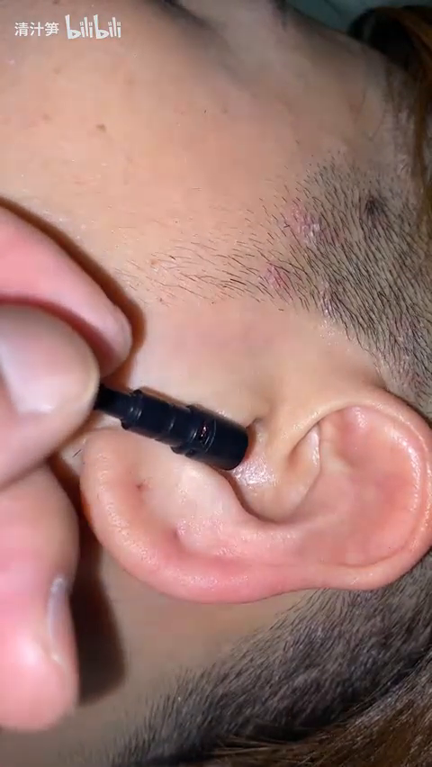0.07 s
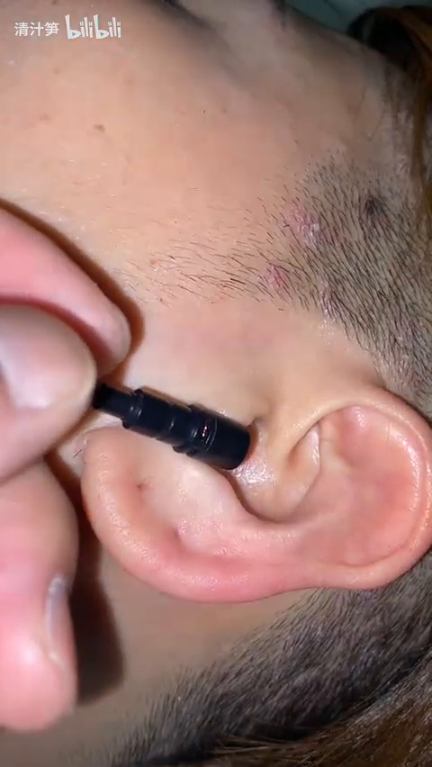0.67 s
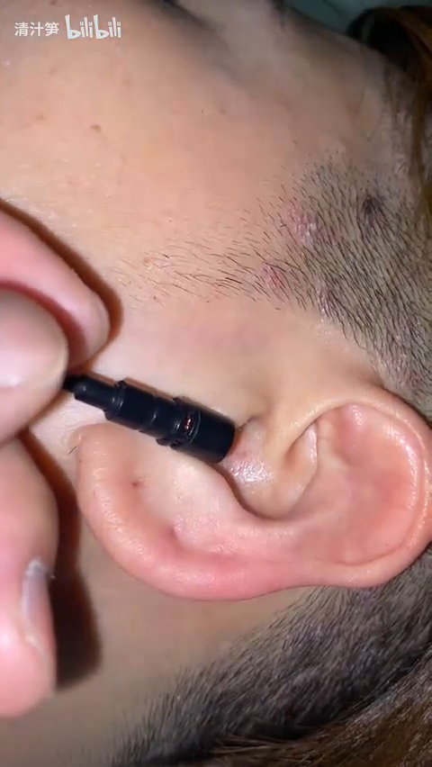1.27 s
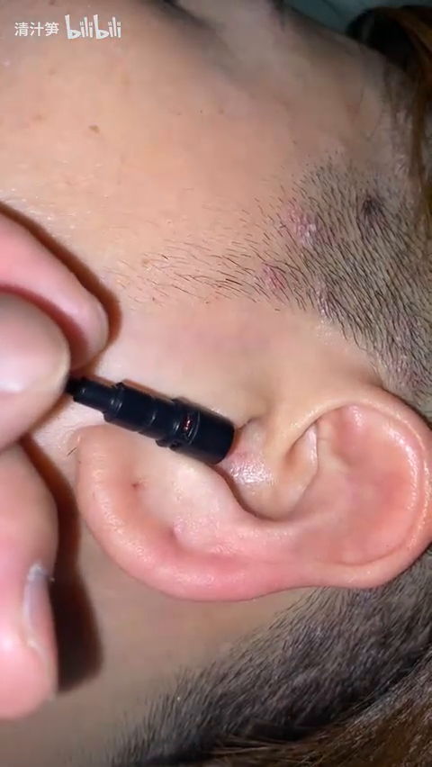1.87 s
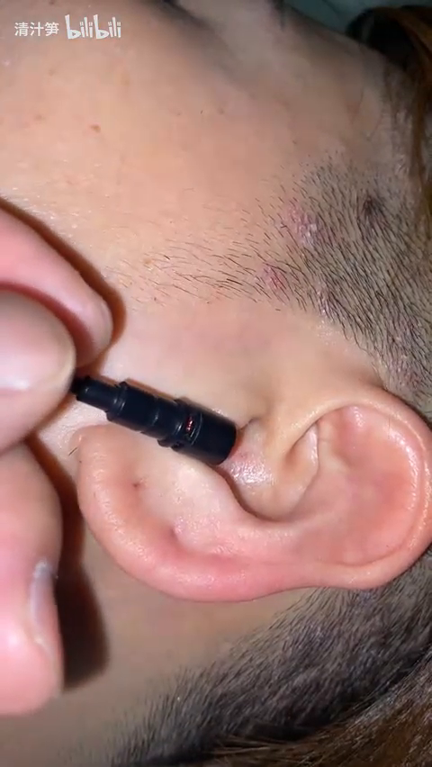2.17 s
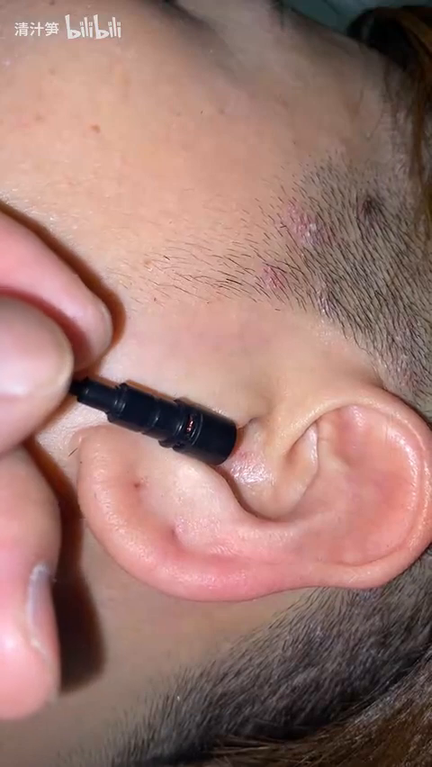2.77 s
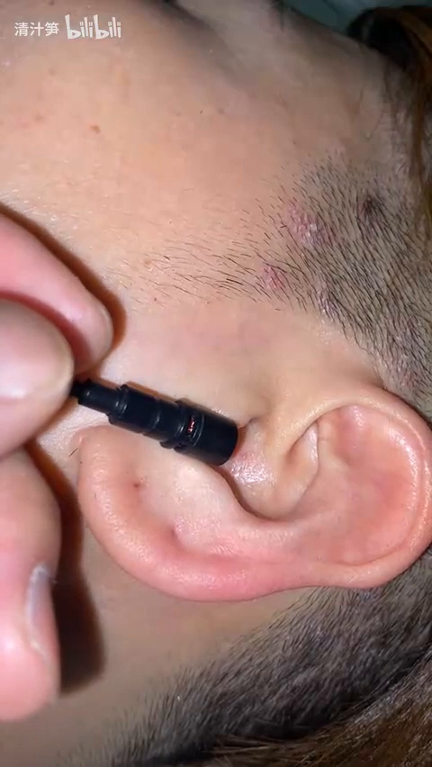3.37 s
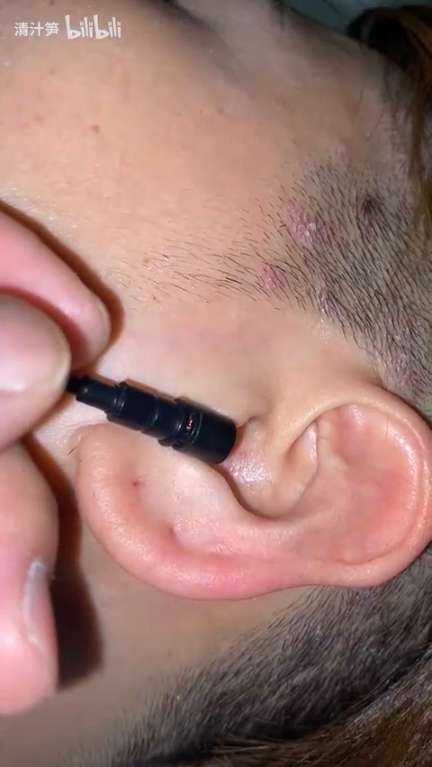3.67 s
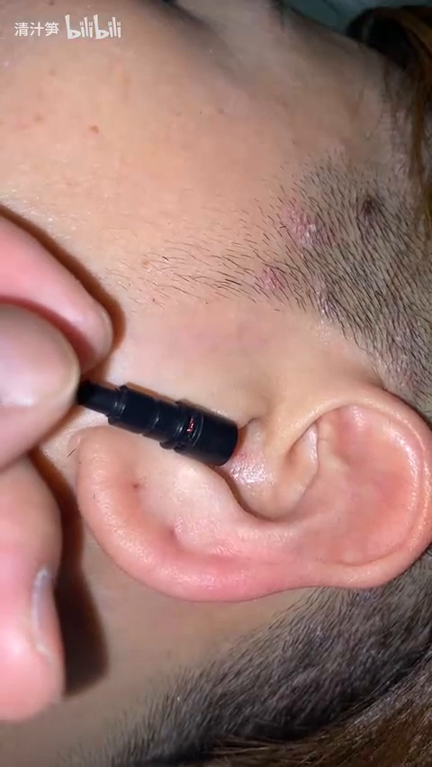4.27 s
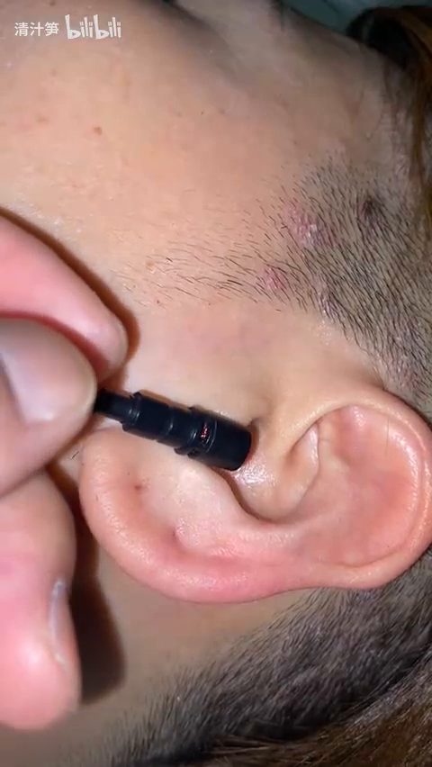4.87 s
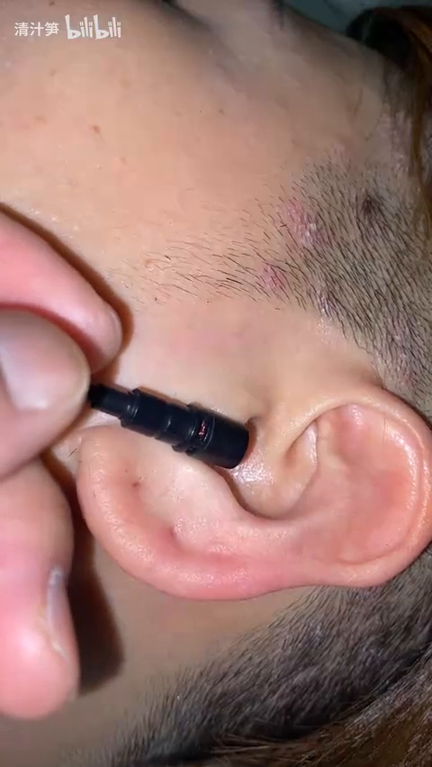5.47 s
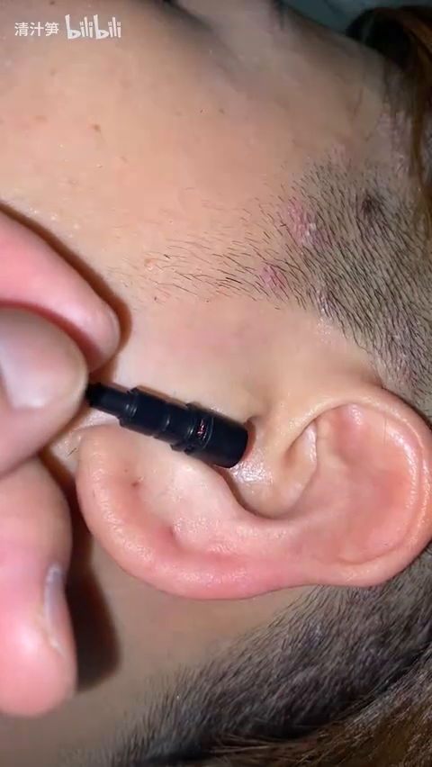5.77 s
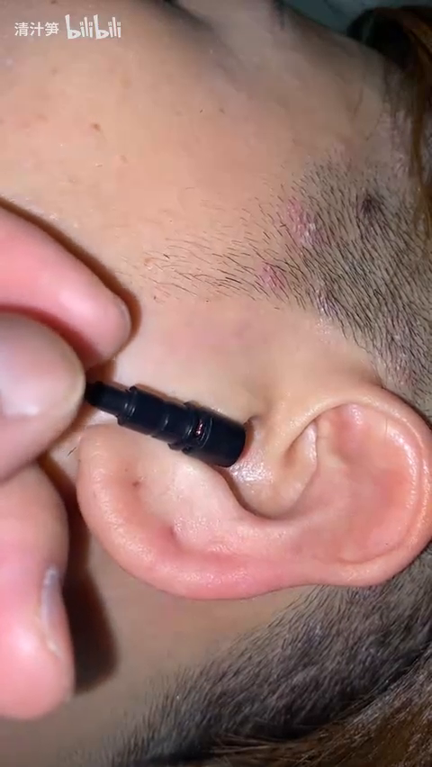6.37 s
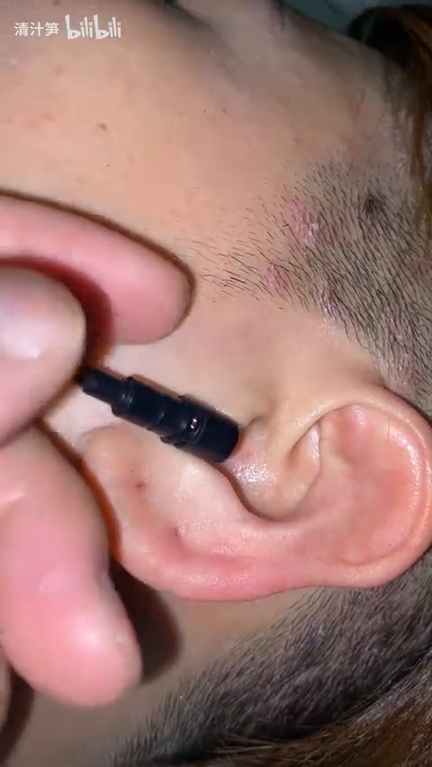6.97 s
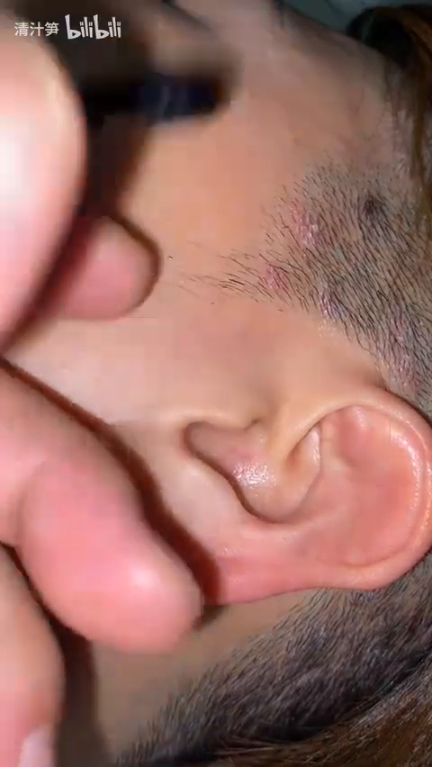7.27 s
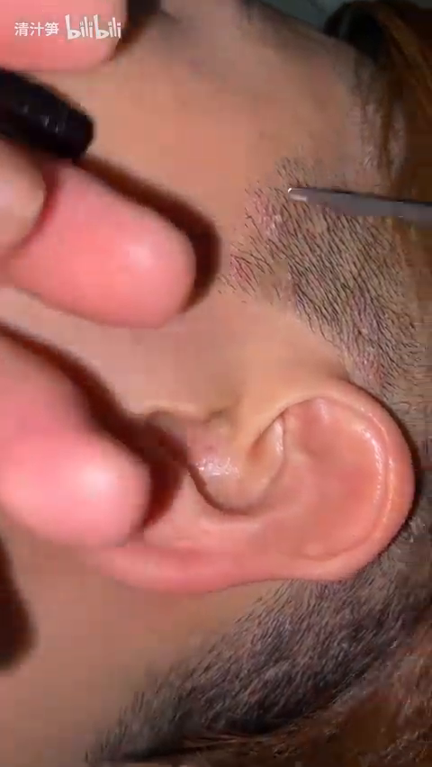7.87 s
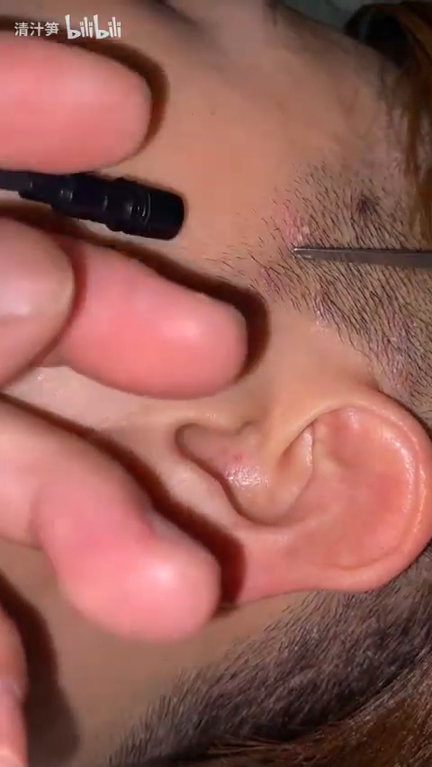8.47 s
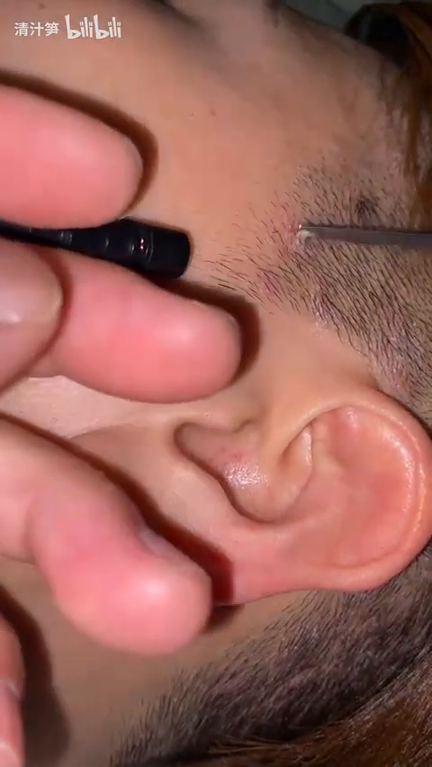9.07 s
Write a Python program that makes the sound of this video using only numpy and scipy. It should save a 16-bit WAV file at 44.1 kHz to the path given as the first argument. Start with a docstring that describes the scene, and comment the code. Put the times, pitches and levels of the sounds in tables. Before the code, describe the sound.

In a quiet room with a faint low hum, a slim tool is worked in an ear right at the microphone. Its tip sticks and peels off in three short runs of small hollow clicks, with light handle ticks and faint skin rustle between. Then the tool is withdrawn, and fingers shift their grip with louder sharp taps, soft bumps and raspy rubbing on the housing.

```python
"""First comes faint room noise with a low hum and a flutter too deep to hear, then a tool's handle ticks.
The slim tool is worked in an ear, right at the microphone: its tip sticks and peels off in three short
runs of hollow clicks that ring in the tip, the shaft and the ear canal. Then it is withdrawn. Fingers
shift their grip, snap and bump against the housing and rub over it in several strokes; their skin
catches and slips, which makes a low shudder, a rasp and a hiss."""
import sys
import numpy as np
from scipy import signal
from scipy.fft import rfft, irfft, next_fast_len
from scipy.io import wavfile
from scipy.ndimage import map_coordinates

SR = 44100
rng = np.random.default_rng(int(sys.argv[2]) if len(sys.argv) > 2 else 0)


def master_out(mix):
    """Clip the mix to full scale and print it as 16-bit PCM to the path in sys.argv[1]."""
    frames = np.transpose(np.atleast_2d(mix))
    ceiling = np.clip(frames, -1, 1)
    pcm = np.round(ceiling * 32767).astype(np.int16)
    wavfile.write(sys.argv[1], SR, pcm)


N = 407043

# tone of the room noise: (frequency [Hz], level [dB])
ROOM_NOISE_TONE = [(40, -26), (70, -4.5), (115, -14.5), (200, -2.5), (300, -6.5), (450, -10), (1000, -12),
                   (1600, -16), (3000, -23.5), (5800, -23), (7000, -28), (10000, -28.5), (15000, -30.5)]
# tones of the motor's hum: (frequency [Hz], level [dB])
HUM_TONES = [(48.4, -69.5), (96.9, -81), (145.3, -74)]
# how long the room rings: (frequency [Hz], time to fade by 60 dB [s])
ECHO_TIMES = [(200, 0.083), (1500, 0.15), (5000, 0.24), (12000, 0.14)]

# finger strokes over tool and housing: (time of fastest sliding [s], rise [s], fall [s],
# rasp level [dB], shudder above the rasp [dB], hiss above the rasp [dB])
FINGER_STROKES = [(1.02, 0.076, 0.16, -60.5, -13, -9.5), (1.35, 0.034, 0.068, -69, -5, -5),
                  (2.885, 0.026, .05, -66, -2.5, -5), (4.55, 0.056, 0.15, -67.5, 1, -6),
                  (4.82, 0.024, 0.07, -60, -5, 0), (4.905, 0.033, 0.032, -63, -6, -5.5),
                  (5.12, 0.049, 0.098, -69, 1, -7), (6.25, 0.11, 0.047, -63, -3, -12),
                  (6.44, 0.088, 0.21, -65.5, -13, -10), (6.96, 0.068, .08, -63, -4.5, -6.5),
                  (7.11, 0.084, 0.1, -65, -4, 7.5), (7.17, .025, 0.036, -50, -11, -5),
                  (7.215, 0.023, 0.055, -53.5, 5.5, -3), (7.412, 0.015, 0.016, -50.5, 4, 3),
                  (7.495, 0.04, 0.019, -33, -3, -10), (7.545, 0.0084, 0.0074, -37.5, -8, -22),
                  (7.57, 0.081, 0.032, -53, 8.5, 2.5), (7.902, 0.064, .033, -52.5, 6.5, 0.5),
                  (7.975, 0.02, 0.049, -64.5, 3.5, 8.5), (8.1, 0.061, 0.055, -51, -2.5, 2.5),
                  (8.189, 0.047, .018, -56.5, 10.5, -1.5), (8.25, 0.031, 0.027, -64, 2, 4),
                  (8.36, .06, 0.049, -56.5, -2.5, 2.5), (8.472, 0.014, 0.055, -60, 0.5, 2.5),
                  (8.595, 0.097, .05, -56, -1.5, 2), (8.69, 0.065, 0.037, -62.5, 5, 3),
                  (8.87, 0.045, .06, -66.5, 1.5, -1)]
# the holding hand is never quite still: (shudder level [dB], rasp level [dB], hiss level [dB])
FIDGET_LEVELS = [-86.5, -77, -84]
# how the housing rings under a rubbing finger: (frequency [Hz], width [Hz], level [dB])
HOUSING_RESONANCES = [(122, 105, 9.5), (304, 200, -2), (500, 33, -26)]
# faint whistles of the gap between finger and housing: (frequency [Hz], width [Hz], level [dB])
GAP_RESONANCES = [(9900, 1600, -5.5), (14000, 620, -13)]
# tone of the rasp of sliding skin: (frequency [Hz], level [dB])
RASP_TONE = [(300, -7), (500, 1), (680, -3.5), (1000, -5), (1800, -8.5), (2300, -9.5), (3300, -16.5),
             (7000, -23), (10000, -32), (13000, -36)]
# tone of the hiss under a light and under a flattened fingertip: (frequency [Hz], level [dB])
LIGHT_HISS_TONE = [(1800, 0), (3300, 0), (5000, 0), (7500, -1), (9000, -7.5), (12000, -20), (14300, -6),
                   (15000, -18)]
PRESSED_HISS_TONE = [(2000, -30), (3300, 1.5), (6000, -3), (10000, -6), (15000, -18)]
# fingers snap off the housing: (time [s], level [dB])
FINGER_SNAPS = [(4.523, -41), (7.146, -18), (7.1827, -19), (7.214, -25), (7.2463, -13.5), (7.4042, -14.5),
                (7.812, -23), (8.052, -28.5), (8.24, -38), (8.3726, -30.5), (8.383, -33), (8.4274, -29.5)]
# soft bumps on the housing: (time [s], level [dB], pitch [Hz], fade length [cycles])
HOUSING_BUMPS = [(4.5219, -41, 337, 0.61), (6.758, -50.5, 92.4, 1.7), (7.1457, -28.5, 230, 0.68),
                 (7.1823, -10, 145, 0.6), (7.1824, -22, 507, 1.1), (7.19, -26, 59, 2.2),
                 (7.4041, -14, 151, 0.77), (7.571, -38.5, 163, 4.3), (7.812, -25.5, 215, 0.62),
                 (7.909, -27.5, 74.4, 1.33), (7.9252, -26.5, 167, 0.63), (8.723, -43, 270, .9)]
# light ticks of the handle: (time [s], level [dB], pitch [Hz])
HANDLE_TICKS = [(0.5904, -28, 2900), (0.6038, -38, 3100), (1.335, -47, 4000), (1.954, -40, 710),
                (4.5223, -41, 600), (5.959, -39, 2800), (7.659, -44, 2200), (8.3619, -26.5, 2300),
                (8.738, -41, 4200), (8.749, -45.5, 3500)]

# what rings in a click (tool tip, ear canal, tool shaft, the crack of the contact itself),
# each as (frequency [Hz], width [Hz], level [dB])
TIP_RESONANCES = [(4010, 310, -9), (4440, 810, -3), (5500, 170, -4.5)]
CANAL_RESONANCES = [(838, 126, 0.5), (1285, 450, -10.5)]
SHAFT_RESONANCES = [(2320, 113, 10.5)]
CRACK_RESONANCES = [(7920, 1200, 0.5), (9300, 720, 0.5), (12500, 1700, -17)]
# the tip drags between contacts: (start [s], length [s], level [dB])
TIP_DRAGS = [(1.124, 0.05, -53), (3.475, 0.048, -57.5), (3.541, 0.053, -50), (5.646, 0.1, -65),
             (5.732, 0.041, -54)]
# sticky contacts in the ear: (time [s], level [dB], canal in the mix [dB], shaft in the mix [dB])
STICKY_CONTACTS = [(1.0782, -38.5, -28, -10), (1.0847, -41.5, -19, -15), (1.1244, -42, -19, -15),
                   (1.1333, -37, -27, -9), (1.1521, -29, -13.5, -14.5), (1.162, -41.5, -24, -29),
                   (3.5004, -35.5, -7.5, -4.5), (3.5428, -27.5, -15, -11), (3.5708, -35.5, -4.5, -15),
                   (3.5744, -41, -20, 3), (5.6518, -44.5, -10, -9), (5.668, -35.5, -10, 1),
                   (5.694, -39, -13, -1), (5.7117, -45, -15, -10), (5.735, -40, -25, -1),
                   (5.7432, -33.5, -17, -14), (5.7465, -24.5, -10.5, -7.5), (5.7574, -36, -24, -9)]

TIP_DB, CRACK_DB = -11, -17.5  # tip and crack in the mix of every click
STROKE_SHAPE = 1.69  # shape of a stroke's swell and fade: 1 is pointed, 2 is a bell
BEAR_DOWN_DB = 1.5  # the finger presses harder as it goes: shudder gained over one rise or fall time
FIDGET_SWING_DB = 4  # how far the faint rustle between strokes comes and goes
LOW_CUT_HZ, TOP_HZ = 39, 16000  # the handling sounds carry nothing deeper, the recorder cuts off higher sound


def amp(db):
    """Turn decibels into a factor to multiply by."""
    return 10 ** (np.asarray(db) / 20)


def unit(x):
    """Scale a sound to an average strength (rms) of 1."""
    return x / np.sqrt(np.mean(x ** 2) + 1e-20)


def along(points, hz):
    """Read between (frequency, value) points, with octaves evenly spaced."""
    freqs, values = np.transpose(points)
    return np.interp(np.log(hz + 1), np.log(freqs + 1), values)


def filtered(x, response):
    """Multiply each frequency in a sound by response(frequency)."""
    size = next_fast_len(2 * len(x))
    return irfft(rfft(x, size) * response(np.fft.rfftfreq(size, 1 / SR)), size)[:len(x)]


def coloured(x, tone):
    """Shape a sound with a tone table and scale it to strength 1."""
    return unit(filtered(x, lambda hz: amp(along(tone, hz))))


def resonate(x, resonances):
    """Let a sound ring at a few frequencies; the narrower the width, the longer the ring."""
    return filtered(x, lambda f: sum(amp(db) * 1j * f * width / (hz * hz - f * f + 1j * f * width)
                                     for hz, width, db in resonances))


def dulled(x, hz, order):
    """Turn down the treble above hz; a higher order cuts more steeply."""
    return signal.sosfilt(signal.butter(order, hz, fs=SR, output='sos'), x)


def thinned(x, hz, order):
    """Turn down the bass below hz."""
    return signal.sosfilt(signal.butter(order, hz, 'high', fs=SR, output='sos'), x)


def wobble(rate):
    """A smooth curve through `rate` random values a second."""
    return map_coordinates(rng.standard_normal(int(N * rate / SR) + 4), [np.arange(N) * rate / SR])


def add(track, start, sound):
    """Mix a sound into a track at `start` seconds."""
    part = track[round(start * SR):][:len(sound)]
    part += sound[:len(part)]


def background():
    """Room noise, a motor's low hum and a flutter too deep to hear."""
    t = np.arange(N) / SR
    air = amp(-66.5 + 0.43 * wobble(rate=3.26)) * coloured(rng.standard_normal(N), ROOM_NOISE_TONE)
    drift = 0.19 * wobble(rate=3.3)
    hum = sum(amp(db) * np.sqrt(2) * np.sin(2 * np.pi * hz * t + drift) for hz, db in HUM_TONES)
    flutter = amp(-46.2) * np.sin(2 * np.pi * 11.5 * t)
    return air + hum + flutter


def room_echo(x):
    """The room adds a short, smooth tail in which each frequency dies at its own speed."""
    hz, t, noise = signal.stft(rng.standard_normal(SR // 2), SR, nperseg=256)
    fade = amp(-60 * t / along(ECHO_TIMES, hz)[:, None])
    tail = signal.istft(noise * fade, SR, nperseg=256)[1]
    tail *= 1 - np.exp(-np.arange(len(tail)) / SR / 0.013)  # the echo takes a moment to build
    return signal.fftconvolve(x, tail / np.linalg.norm(tail))[:N]


def slips(rate, spread_db):
    """Sliding as tiny one-way jerks at random moments, about `rate` a second."""
    moments = rng.random(N) < rate / SR
    jerks = moments * amp(spread_db * np.clip(rng.standard_normal(N), -2, 2))
    return unit(jerks - jerks.mean())


def stick_slip(rate, scatter):
    """Skin catches and lets go at an uneven pace, with one jerk each time it lets go."""
    count = np.cumsum(rate * np.exp(scatter * wobble(rate=150))) / SR
    releases = np.diff(np.floor(count), prepend=0)
    jerks = releases * amp(2.5 * np.clip(rng.standard_normal(N), -2, 2))
    return unit(jerks - jerks.mean())


def stroke_levels():
    """Shudder, rasp and hiss in dB: over faint fidgeting, each stroke swells, fades and turns heavier."""
    t = np.arange(N) / SR
    power = np.outer(amp(FIDGET_LEVELS), amp(FIDGET_SWING_DB * wobble(rate=5))) ** 2
    for time, rise, fall, db, shudder_db, hiss_db in FINGER_STROKES:
        near = slice(max(0, int((time - 4 * rise) * SR)), int((time + 4 * fall) * SR))
        progress = (t[near] - time) / np.where(t[near] < time, rise, fall)
        rasp = amp(db) * np.exp(-np.abs(progress) ** STROKE_SHAPE)
        shudder = rasp * amp(shudder_db + BEAR_DOWN_DB * progress)
        power[:, near] += np.array([shudder, rasp, rasp * amp(hiss_db)]) ** 2
    return 10 * np.log10(power)


def gap_whistle():
    """The gap under the finger opens and closes as it rolls, so faint whistles come and go."""
    whistle = np.zeros(N)
    for hz, width, db in GAP_RESONANCES:
        opening = amp(db + 0.5 + 2.6 * wobble(rate=12))
        whistle += opening * unit(resonate(slips(rate=23000, spread_db=3), [(hz, width, 0)]))
    return dulled(whistle, 15200, order=12)


def finger_rubbing():
    """Skin slides in small slips: heavy ones shake the housing, many fine ones rasp and hiss."""
    shudder_db, rasp_db, hiss_db = stroke_levels()
    heavy = stick_slip(rate=230, scatter=0.6)
    housing = resonate(heavy + 0.5 * slips(rate=2000, spread_db=4), HOUSING_RESONANCES)
    shudder = amp(shudder_db + 3) * unit(dulled(housing, 660, order=4))
    rasp = amp(rasp_db) * coloured(0.32 * heavy + slips(rate=4000, spread_db=2), RASP_TONE)
    whistle = gap_whistle()
    bright = unit(coloured(0.19 * heavy + slips(rate=14000, spread_db=5.5), LIGHT_HISS_TONE) + whistle)
    dark = coloured(slips(rate=12000, spread_db=8), PRESSED_HISS_TONE)
    # a flattened fingertip muffles the hiss: the more the rasp leads, the darker it gets
    pressed = np.clip((rasp_db - hiss_db) / 9, 0, 1)
    hiss = amp(hiss_db + 0.5) * (np.sqrt(1 - pressed) * bright + np.sqrt(pressed) * dark)
    grip = amp(1.7 * wobble(rate=83))
    return grip * (shudder + rasp + hiss)


def contact(t, grit, fade_s):
    """The force of a touch: one sharp push, then a brief gritty release."""
    force = grit * rng.standard_normal(len(t)) * np.exp(-t / fade_s)
    force[0] += 1
    return force


def finger_knocks():
    """Snaps are sharp spikes with a gritty tail; bumps rock the housing briefly to and fro."""
    out, t = np.zeros(N), np.arange(SR // 10) / SR
    for time, db in FINGER_SNAPS:
        snap = resonate(contact(t, grit=0.07, fade_s=0.0022), [(690, 2900, 0)])
        add(out, time, -amp(db - 30) * unit(dulled(snap, 14000, order=2)))
    for time, db, hz, fade_cycles in HOUSING_BUMPS:
        cycles = hz * t
        swell = (1 - np.exp(-cycles / 0.13)) * np.exp(-(cycles / fade_cycles) ** 2)
        bump = np.sin(2 * np.pi * cycles) * swell
        add(out, time, amp(db) * bump / np.abs(bump).max())
    return out


def handle_ticks():
    """The plastic handle ticks: one broad ring that dies at once, with its top softened."""
    out, t = np.zeros(N), np.arange(SR // 20) / SR
    for time, db, hz in HANDLE_TICKS:
        tick = resonate(contact(t, grit=0.19, fade_s=0.0018), [(hz, 1.1 * hz, 0)])
        add(out, time, amp(db - 26) * unit(dulled(tick, 1.72 * hz, order=3)))
    return out


def ear_ringing(force, mix_db):
    """A force sets tip, ear canal, shaft and crack sounding; mix_db sets their balance in that order."""
    force = thinned(force, 650, order=6)  # so small a source gives off no bass
    tip = unit(dulled(resonate(force, TIP_RESONANCES), 6640, order=8))
    canal = unit(dulled(resonate(force, CANAL_RESONANCES), 2020, order=3))
    shaft = unit(dulled(resonate(force, SHAFT_RESONANCES), 5800, order=3))
    crack = unit(dulled(resonate(force, CRACK_RESONANCES), 15500, order=2))
    return unit(amp(mix_db) @ np.array([tip, canal, shaft, crack]))


def ear_clicks():
    """The tip sticks and peels off in a tiny burst of grit; between clicks it drags a little."""
    clicks, t = np.zeros(N), np.arange(SR // 10) / SR
    for time, db, canal_db, shaft_db in STICKY_CONTACTS:
        peel = contact(t, grit=0.68, fade_s=0.0017)
        add(clicks, time, amp(db - 22) * ear_ringing(peel, [TIP_DB, canal_db, shaft_db, CRACK_DB]))
    scrape = ear_ringing(slips(rate=2500, spread_db=0), mix_db=[1.5, 3.5, 3.5, 3.8])
    swell = np.zeros(N)
    for start, length, db in TIP_DRAGS:
        add(swell, start, amp(db) * np.sqrt(np.hanning(int(length * SR))))
    return clicks + swell * scrape


def scene():
    """Clicks and ticks reach the room; the fingers' sounds go almost straight into the microphone."""
    clicks, ticks = ear_clicks(), handle_ticks()
    handling = thinned(finger_knocks() + finger_rubbing(), LOW_CUT_HZ, order=2)
    echo = room_echo(amp(-11.5) * clicks + amp(-8.5) * ticks + amp(-33) * handling)
    return (clicks + ticks + handling + echo + background())[None]


def record(dry):
    """The recorder cuts off the treble above TOP_HZ."""
    return filtered(dry[0], lambda hz: 1 / np.sqrt(1 + (hz / TOP_HZ) ** 200))[None]


dry = scene()
out = record(dry)
master_out(out)
```